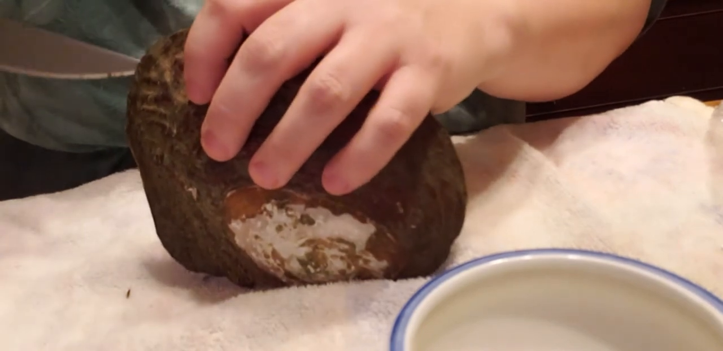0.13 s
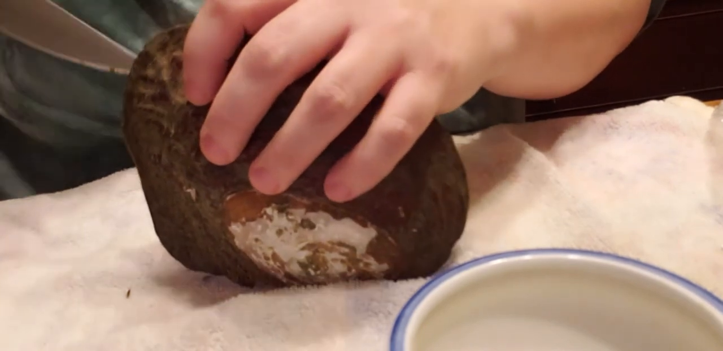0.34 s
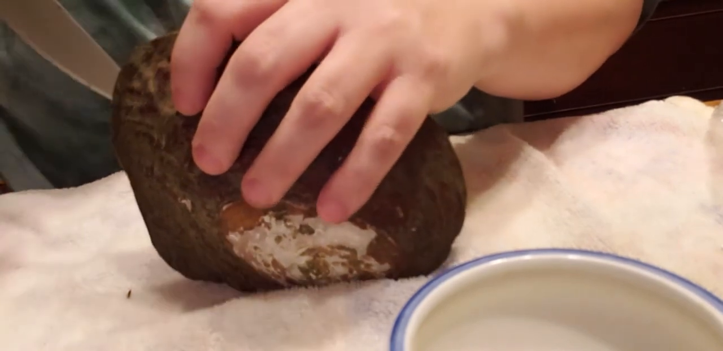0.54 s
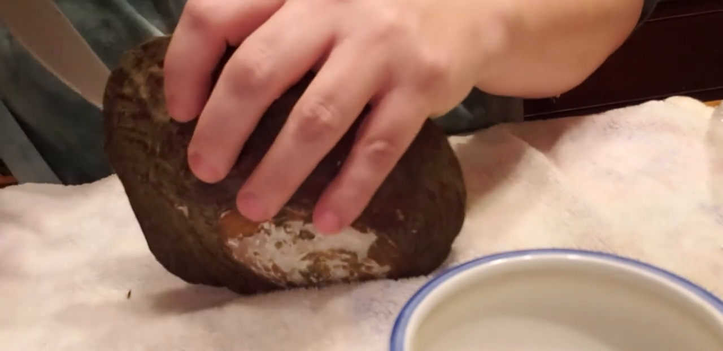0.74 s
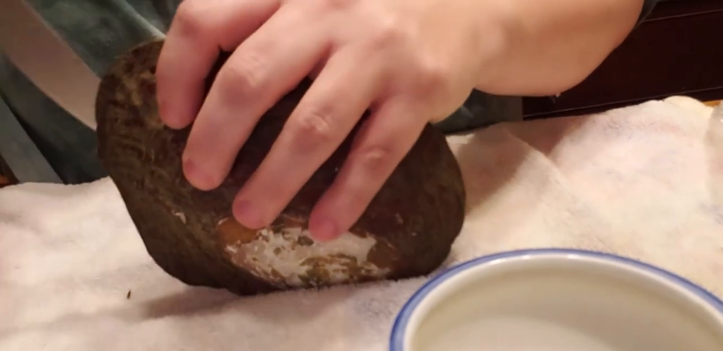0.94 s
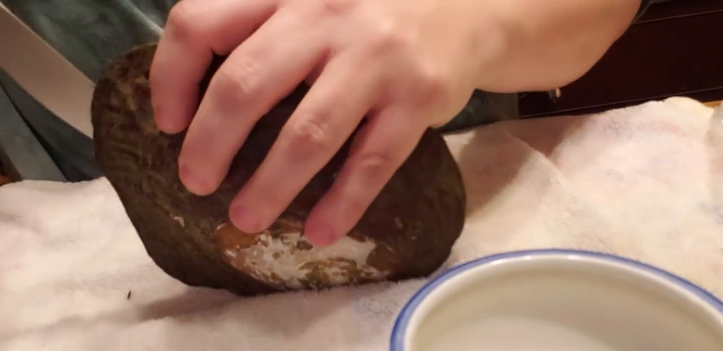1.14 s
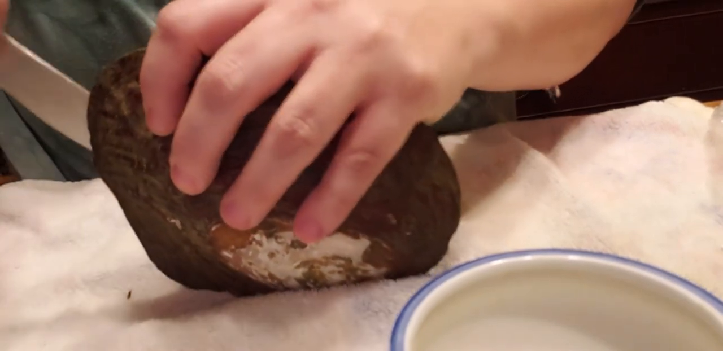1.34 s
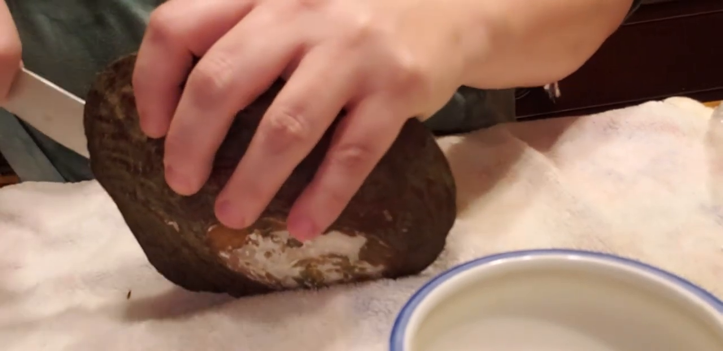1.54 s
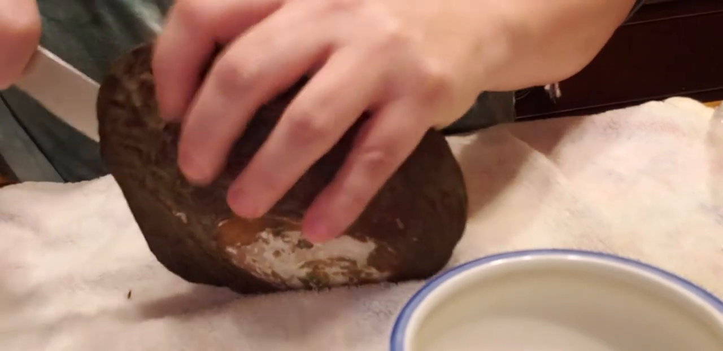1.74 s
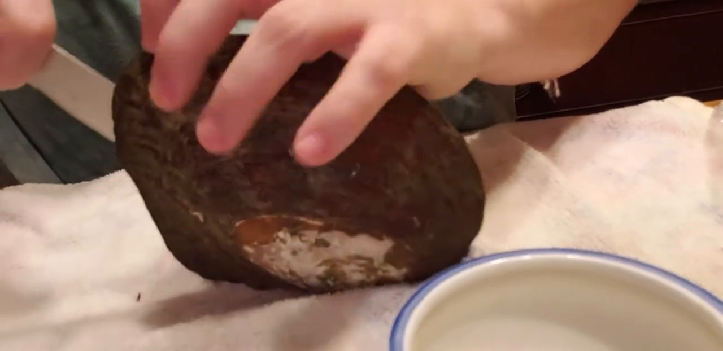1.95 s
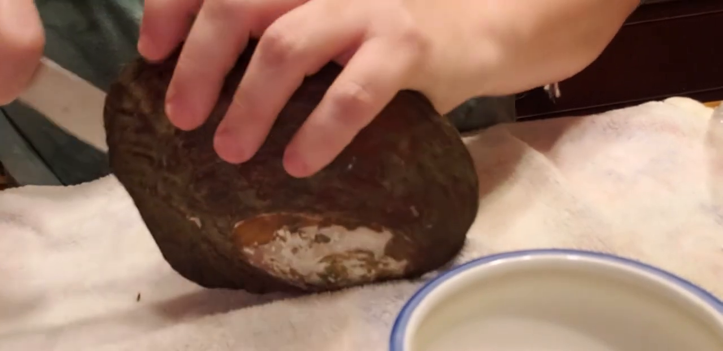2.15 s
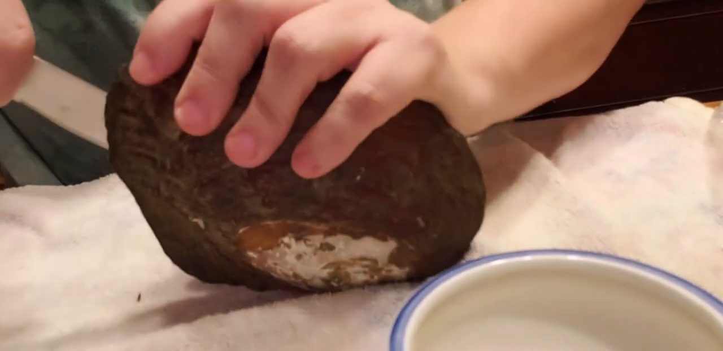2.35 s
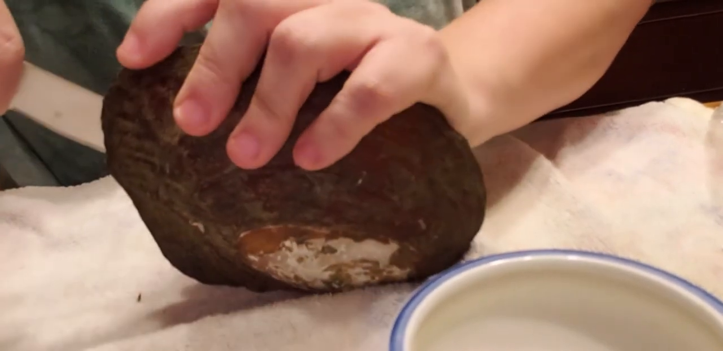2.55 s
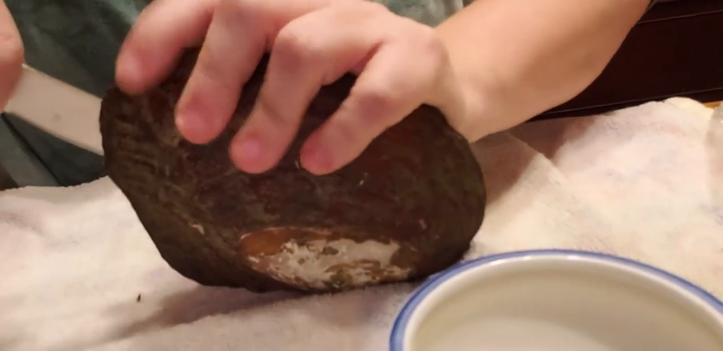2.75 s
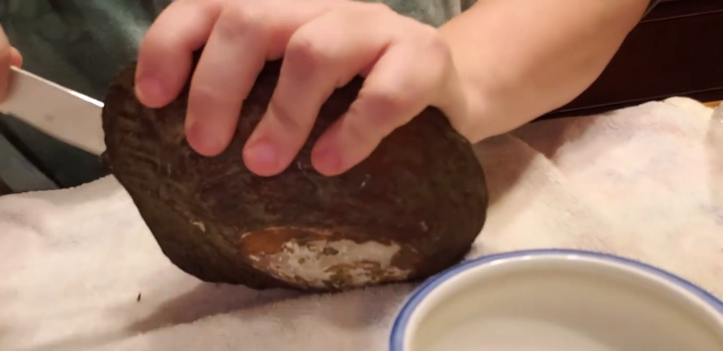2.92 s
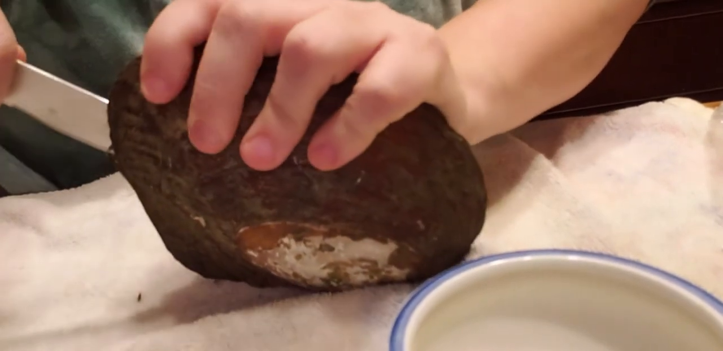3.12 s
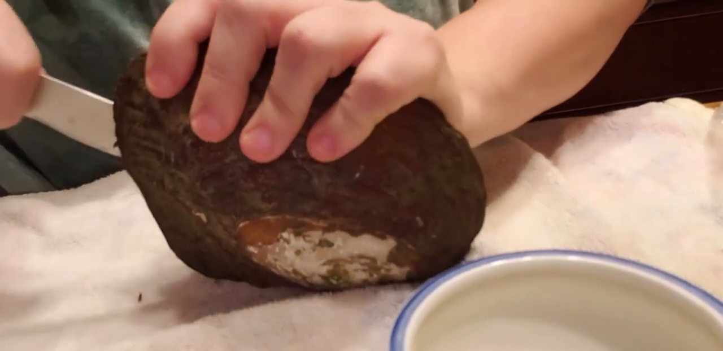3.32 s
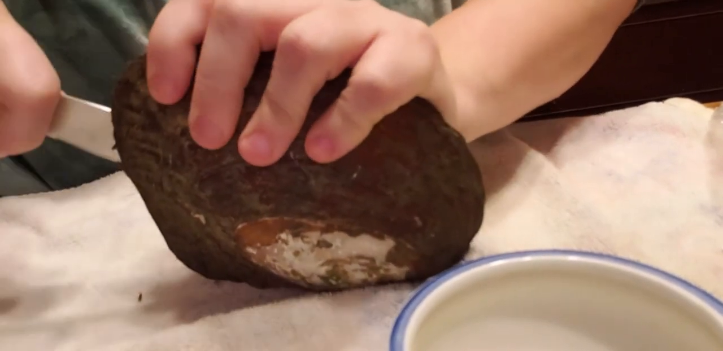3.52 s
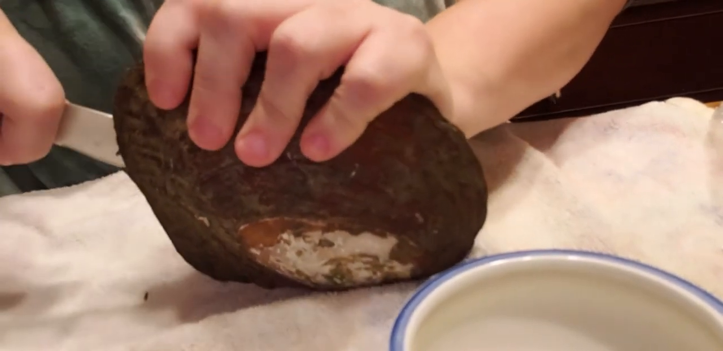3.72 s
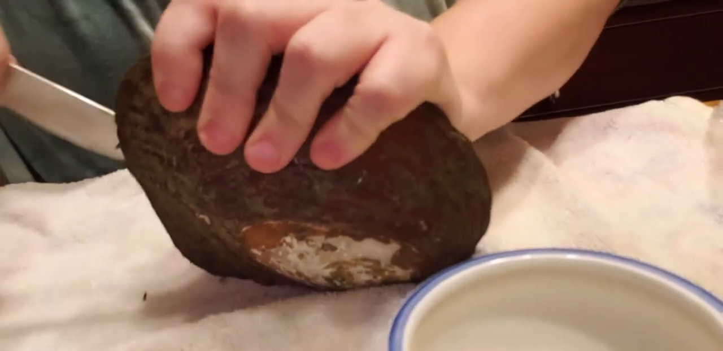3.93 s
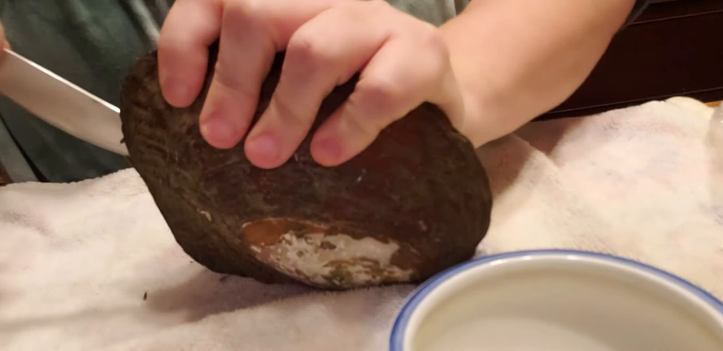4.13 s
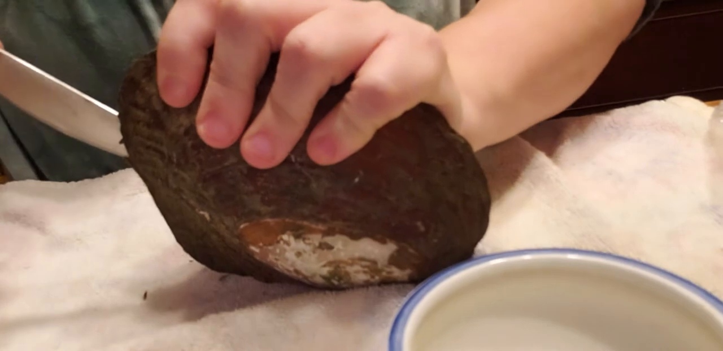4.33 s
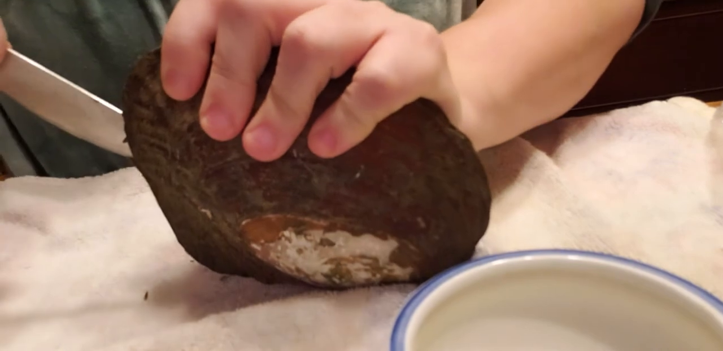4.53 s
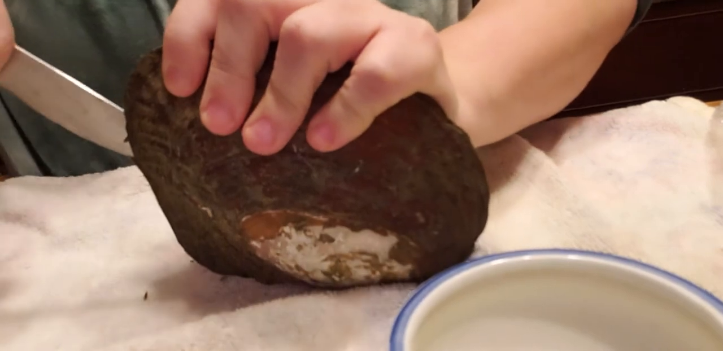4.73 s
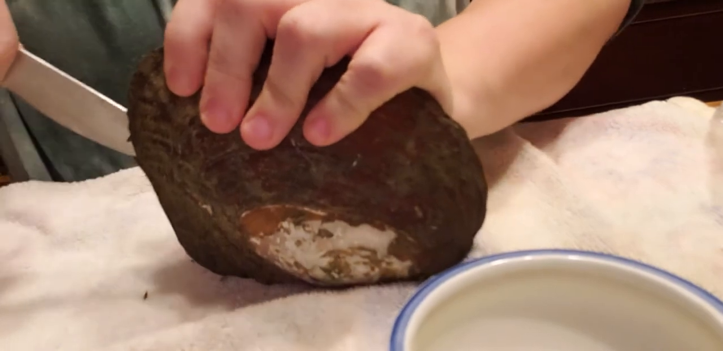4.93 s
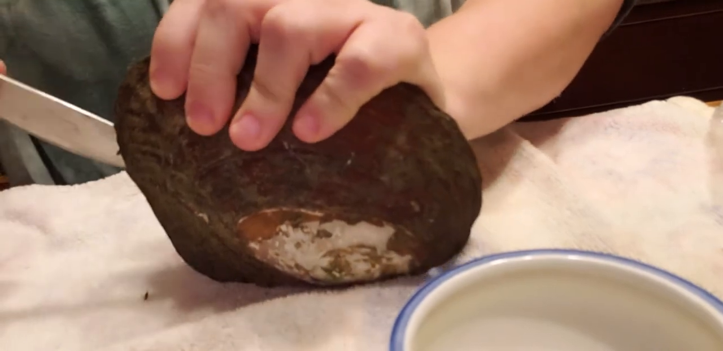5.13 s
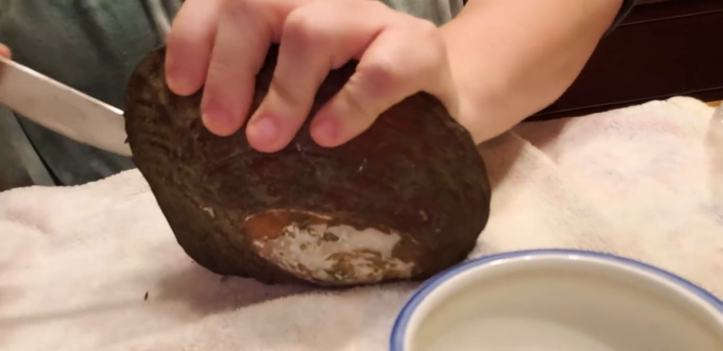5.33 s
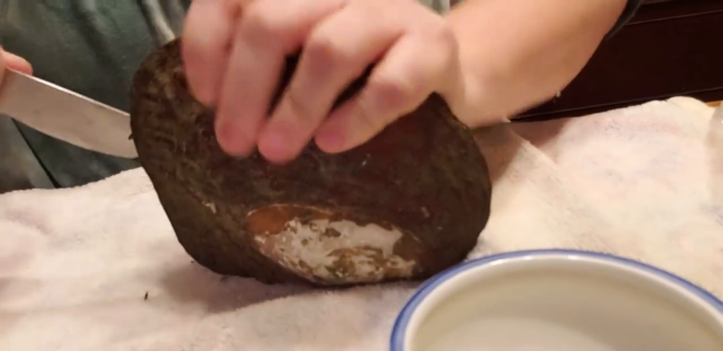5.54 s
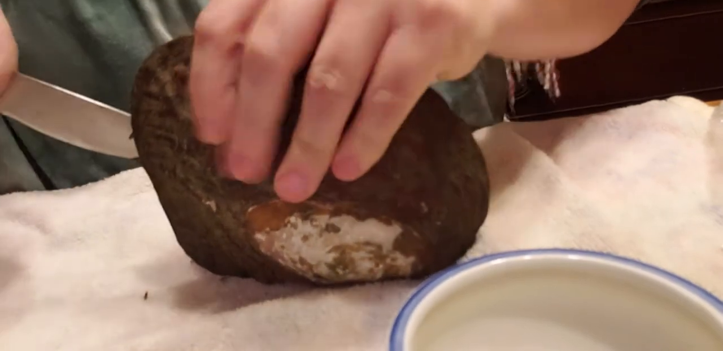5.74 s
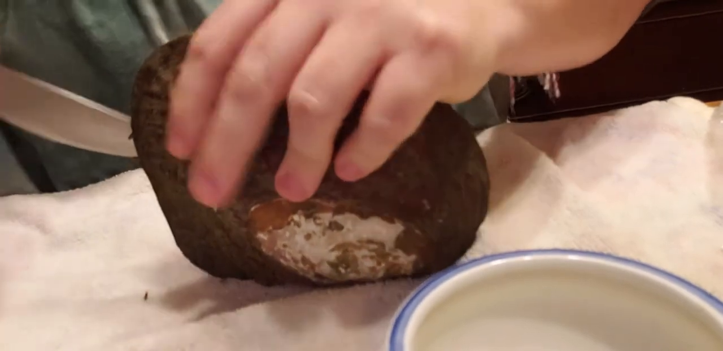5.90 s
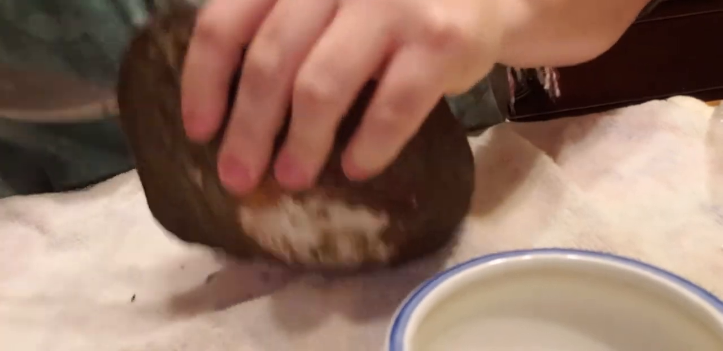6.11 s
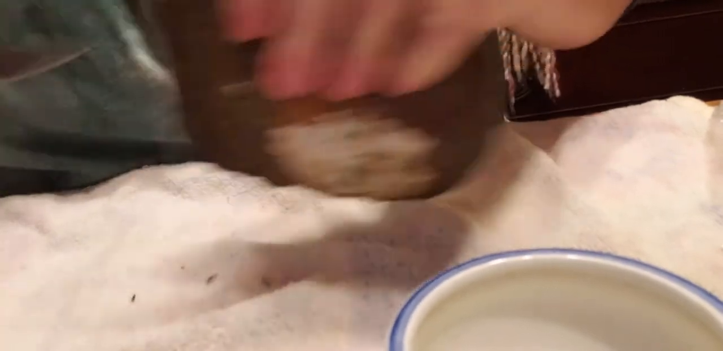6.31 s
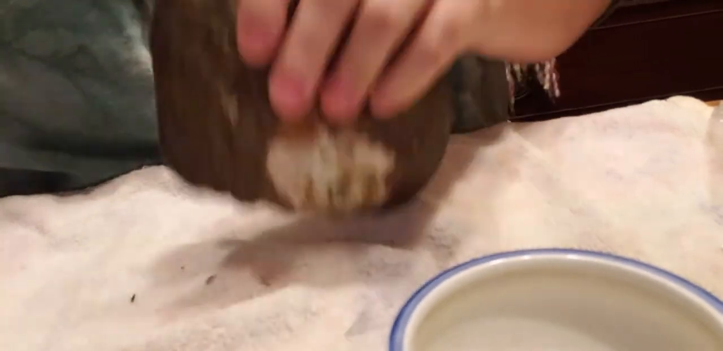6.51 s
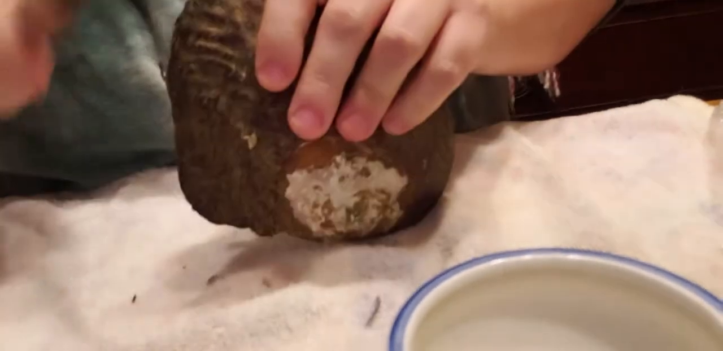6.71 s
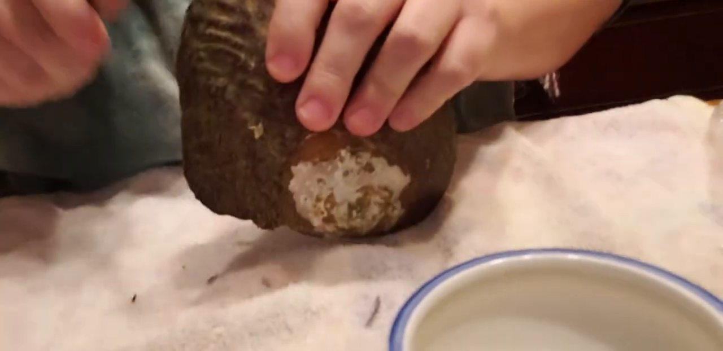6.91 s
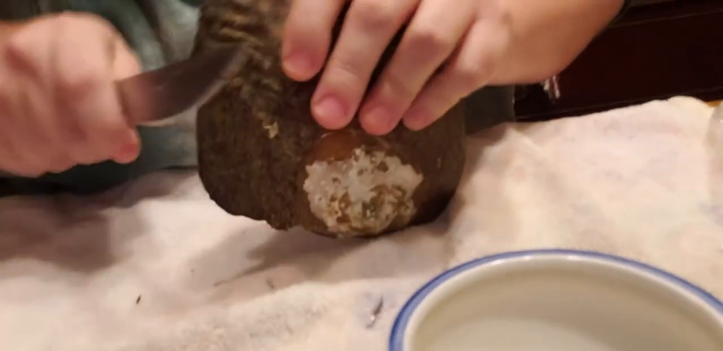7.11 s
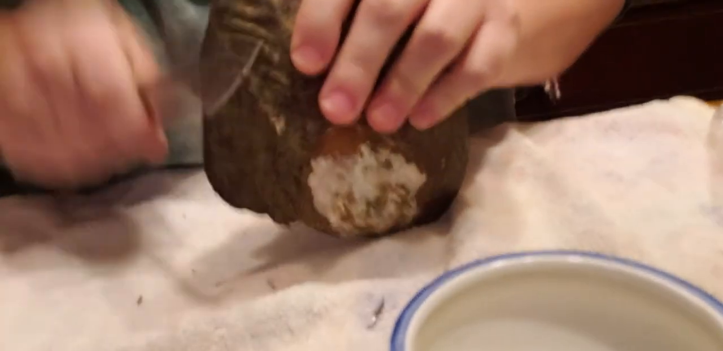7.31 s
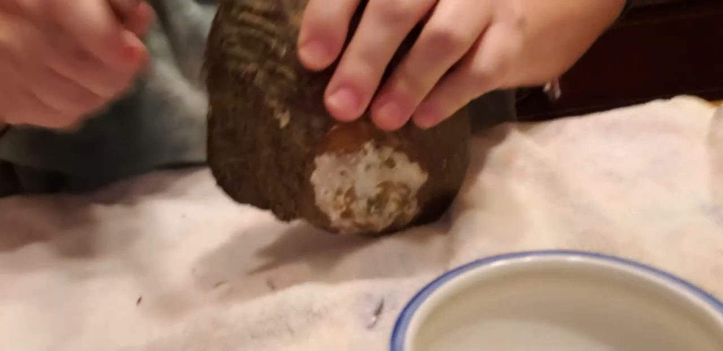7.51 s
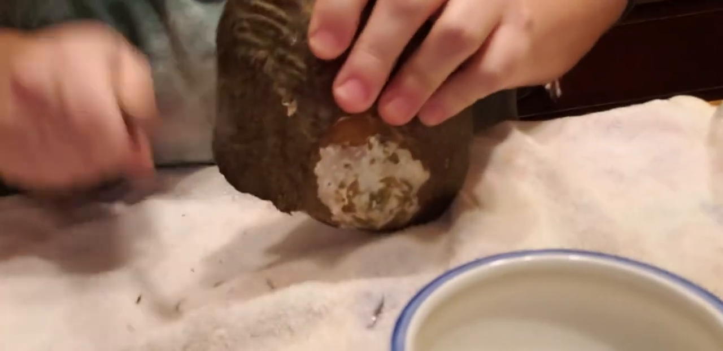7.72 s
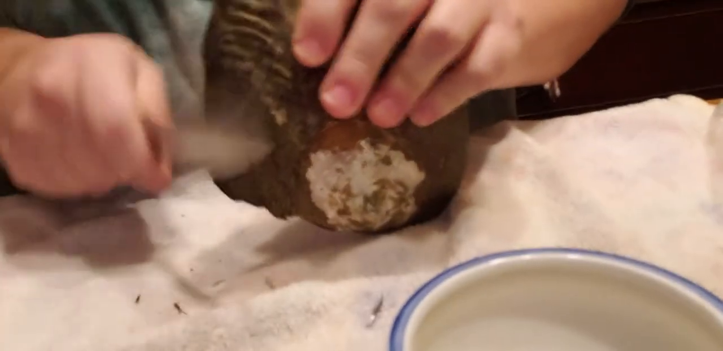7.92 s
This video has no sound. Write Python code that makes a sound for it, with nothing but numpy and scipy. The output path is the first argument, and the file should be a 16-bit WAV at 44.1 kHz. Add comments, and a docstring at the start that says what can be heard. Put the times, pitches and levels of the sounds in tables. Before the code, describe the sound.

A small, quiet room heard very close in stereo, with faint low rumble and slight hiss. From 0.1 s a knife feels for a shell's seam with faint taps, then grinds in short uneven pushes, strongest around 0.8 to 1.5 s: dry rasp, fine grit and the dull rub of shell on towel. It thins to near quiet around 2 s, with little clicks at 2.3 and 2.8. Lower, slightly groaning scrapes come at 3.3 to 4.2 s, then sparse touches and a sharp click at 5.25. Light rubbing near 5.6 leads to bright ticks with a tiny high squeal and steel skid at 6.0, and another slip at 6.3. At 6.63 the shell lands with a heavy padded thud, the table ringing briefly. Four quick chipping strokes at about 7.1, 7.4, 7.6 and 7.9 s crackle and crumble over low thumps, trailing loose crumbs.

```python
"""A small room, two microphones close to a towel-covered table: a hand holds a large shell there
while a knife is worked into its seam. The blade rasps and clicks in slow pushes and slides out;
the shell is set down with a thud, then four quick strokes chip its crumbly edge. Friction is coloured noise
made of random slips, fractures are tiny noise bursts, knocks and table are decaying sines; the room answers."""
import sys
import numpy as np
from scipy import signal
from scipy.fft import rfft, irfft, next_fast_len
from scipy.io import wavfile
from scipy.ndimage import map_coordinates

SR = 44100
rng = np.random.default_rng(int(sys.argv[2]) if len(sys.argv) > 2 else 0)


def persist_wave(psi):
    """Save psi, clipped to +-1, as 16-bit WAV."""
    counts = np.round(np.clip(psi, -1, 1) * 32767).astype(np.int16)
    wavfile.write(sys.argv[1], SR, np.atleast_2d(counts).T)


N = 355446  # samples

TOP_HZ = 15900  # upper band limit


def amp(db):
    """Decibels to gain."""
    return 10 ** (np.asarray(db) / 20)


def unit(x):
    """Scale to rms 1."""
    return x / np.sqrt(np.mean(x ** 2) + 1e-20)


def along(points, hz):
    """Read a curve of (frequency [Hz], value) points on a log frequency axis."""
    f, v = np.transpose(points)
    return np.interp(np.log(hz + 1), np.log(f + 1), v)


def wobble(rate):
    """A smooth random curve, rate knots a second."""
    knots = rng.standard_normal(int(N * rate / SR) + 4)
    return map_coordinates(knots, [np.arange(N) * rate / SR])


def add(track, s, sound):
    """Mix a sound into a track at time s."""
    part = track[round(s * SR):][:len(sound)]
    part += sound[:len(part)]


def colour(x, spectrum, size=8192):
    """Causal minimum-phase filter of energy 1, shaped like the given spectrum."""
    hz = np.fft.rfftfreq(size, 1 / SR)
    gain = amp(along(spectrum, hz))
    # folding the cepstrum puts all of the response after the blow
    cepstrum = irfft(np.log(np.maximum(gain, 1e-6)))
    cepstrum[1:size // 2] *= 2
    cepstrum[size // 2 + 1:] = 0
    response = irfft(np.exp(rfft(cepstrum)))
    return signal.oaconvolve(x, response / np.linalg.norm(response))[:N]


def slips(rate, spread_db):
    """Friction as tiny slips of uneven size at random times, rate a second, rms 1."""
    happens = rng.random(N) < rate / SR
    sizes = rng.standard_normal(N) * amp(spread_db * rng.standard_normal(N))
    return unit(happens * sizes)


def snap(t60):
    """The noise burst of one brittle fracture: it builds at once and dies away."""
    t = np.arange(SR // 20) / SR
    fade = amp(-60 * t / t60) * np.sqrt(t)
    fade /= fade.max()
    burst = unit(rng.standard_normal(len(t)) * fade)
    return burst * np.sqrt(np.mean(fade ** 2))


def narrow(hz, width_hz):
    """A fuzzy line, a slowly drifting phasor that follows a pitch given for each sample, rms 1."""
    lowpass = signal.butter(2, width_hz / 2, fs=SR, output="sos")
    drift = signal.sosfilt(lowpass, rng.standard_normal((2, len(hz))))
    carrier = np.exp(2j * np.pi * np.cumsum(hz) / SR)
    return unit(np.real((drift[0] + 1j * drift[1]) * carrier))


def sing(chatter, hz, ring_db, width_hz):
    """Blend broad chatter with a narrow rasp around the contact resonance, about rms 1."""
    ring = amp(ring_db) * narrow(hz * np.ones(N), width_hz)
    return (unit(chatter) + ring) / np.hypot(1, amp(ring_db))


def swell(track_db, starts, lengths, rise_s, fall_s):
    """Gain of a row of pushes: each rises, holds in a low arch and falls; rise and fall times span 20 dB."""
    arch_db = 2.5  # a push is this much stronger in its middle than at its ends
    power = np.zeros(N)
    for s, length, db in zip(starts, lengths, track_db):
        first = max(s - .15, 0)  # leaves time for the rise
        t = np.arange(SR // 2) / SR + first - s
        arch = arch_db * np.sin(np.pi * np.clip(t / length, 0, 1))
        slopes = 20 * (np.minimum(t, 0) / rise_s - np.maximum(t - length, 0) / fall_s)
        add(power, first, amp(db - arch_db + arch + slopes) ** 2)
    return np.sqrt(power)


def soften(x):
    """Take the top treble off a light contact."""
    soft_hz = 7400  # low-pass corner
    return signal.sosfilt(signal.butter(4, min(soft_hz, TOP_HZ), fs=SR, output="sos"), x)


def contacts(rows):
    """Each contact gives a sharp tick, a tiny burst of fractures, and knocks the shell's body."""
    # bright tick: (frequency [Hz], relative level [dB])
    tick_colour = [(500, -31), (1500, -10.5), (2200, -6), (3100, -5), (4800, -13.5), (6300, -9),
                   (7350, 1.5), (8600, -11.5), (13500, -9), (15500, -13.5)]
    # a knock through the shell's body: (frequency [Hz], relative level [dB])
    body_colour = [(60, 6.5), (150, 4.5), (250, 1.5), (400, 12.5), (700, -1), (1200, -13.5), (1800, -20.5),
                   (4000, -40.5), (9000, -63.5)]
    tip, body = np.zeros((2, N))
    for s, db, body_db in rows:
        burst = snap(t60=0.0023)
        add(tip, s, amp(db) * burst / np.linalg.norm(burst))
        add(body, s, amp([body_db]))  # one-sample blow
    return colour(tip, tick_colour) + colour(body, body_colour)


def room(x, wet_db, near_db, left_db, stir=25, lead=1.25, near_t60=0.036, apart_hz=600, count=4):
    """Direct sound, scatter from table and hands, and the room's tail, at two close microphones.

    wet_db and near_db set tail and scatter against the direct sound; left_db is left over right;
    stir is path changes [knots/s]; lead is how far the left is ahead [samples]; count is the paths."""
    # the room's decay: (frequency [Hz], t60 [s])
    room_decay = [(100, 0.39), (400, 0.27), (2500, 0.28), (7000, 0.25), (15000, 0.2)]
    noise = rng.standard_normal((2, count, 2, SR // 2))
    hz, t, z = signal.stft(noise, SR, nperseg=512)
    hz = hz[:, None]
    # long waves bend round small things and reach both microphones alike
    short = hz / np.hypot(hz, apart_hz)
    mid = z[0] * np.cos(np.pi / 4 * short)
    side = z[1] * np.sin(np.pi / 4 * short)
    fades = np.array([amp(-60 * t / along(room_decay, hz)), short * np.ones_like(t)])  # tail, scatter
    echoes = signal.istft(np.array([mid + side, mid - side]) * fades, SR, nperseg=512)[1]
    echoes[:, :, 1] *= amp(-60 * np.arange(echoes.shape[-1]) / SR / near_t60)
    echoes /= np.linalg.norm(echoes, axis=-1, keepdims=True)
    tail = amp(wet_db) * np.roll(echoes[:, :, 0], SR // 200, axis=-1)  # 5 ms late
    scatter = amp(near_db) * np.roll(echoes[:, :, 1], SR // 3000, axis=-1)  # a third of a ms late
    # the contact point moves, so the sound keeps leaving by other paths
    shares = np.array([wobble(stir) for _ in range(count)])
    shares /= np.linalg.norm(shares, axis=0)
    reflected = signal.fftconvolve((x * shares)[None], tail + scatter, axes=-1).sum(axis=1)[:, :N]
    taps = np.arange(-8, 9)  # fractional delay, in samples
    direct = np.array([np.convolve(x, np.sinc(taps + shift) * np.hanning(len(taps)), "same")
                       for shift in (lead / 2, -lead / 2)])
    total = np.sqrt(1 + amp(wet_db) ** 2 + amp(near_db) ** 2)
    return (direct + reflected) / total * amp([[left_db / 2], [-left_db / 2]])


def floor():
    """Low room rumble and faint microphone hiss: coloured noise, partly shared by the two microphones."""
    # background: (frequency [Hz], relative level [dB])
    floor_colour = [(15, -36), (25, -14.5), (53, 10.5), (87, 0.5), (335, -16.5), (531, -24), (1130, -28),
                    (5280, -36.5), (7510, -26.5), (8360, -40.5), (11300, -31.5), (16000, -36.5)]
    a, b, shared = [unit(colour(rng.standard_normal(N), floor_colour)) for _ in range(3)]
    return amp(-66.5) * np.array([a, b]) + amp(-69) * shared


def landing():
    """The shell lands and rocks; the towel softens the blows, the table rings and the shell crunches faintly."""
    # blows on the table: (time [s], thud level [dB], crunch level [dB])
    blow_table = [(6.628, -12.5, -29), (6.6429, -19.5, -18.5)]
    # modes of the table with the shell on it: (frequency [Hz], relative level [dB], t60 [s])
    table_modes = [(69.9, -6, 0.25), (125.5, 5, 0.33), (153.3, 0.5, 0.39), (214.6, -14.5, 0.2),
                   (263, -6, 0.24), (351, -2, .19), (415, -4, 0.21)]
    # crunch through the towel: (frequency [Hz], relative level [dB])
    padded_colour = [(50, -12), (160, -6.5), (350, -12), (520, -22), (1100, -38), (3000, -55),
                     (7500, -56.5), (15000, -67)]
    thud, crunch = np.zeros((2, N))
    t = np.arange(SR // 2) / SR
    soft_onset = 1 - np.exp(-t / 0.0023)
    for s, db, crunch_db in blow_table:
        # each blow excites the modes a little differently
        ring = sum(amp(level + rng.normal(0, 1) - 60 * t / t60) * np.sin(2 * np.pi * hz * t)
                   for hz, level, t60 in table_modes)
        add(thud, s, amp(db) * ring / np.abs(ring).max() * soft_onset)
        add(crunch, s, amp(crunch_db) * snap(t60=0.061))
    return room(thud + colour(crunch, padded_colour), wet_db=-7.5, near_db=-12, left_db=0.5, stir=8)


def knocks():
    """The gripped shell rings briefly as decaying sines; the deepest knocks are its rocking on the table."""
    # hollow knocks on blade, hand and table: (time [s], level [dB], pitch [Hz], t60 [s])
    knock_table = [(.059, -33.5, 420, 0.047), (0.162, -23, 420, 0.016), (2.280, -40, 640, 0.031),
                   (2.832, -31.5, 95, .07), (3.625, -33.5, 70, .2), (3.853, -27.5, 105, 0.039),
                   (4.868, -36.5, 72, .13), (5.2461, -17, 1000, 0.0049), (5.618, -27, 72, 0.077),
                   (5.783, -43, 476, 0.02), (6.319, -18, 368, 0.035), (6.321, -31, 2140, 0.01),
                   (6.43, -27.5, 410, 0.0099), (6.435, -34.5, 765, 0.013), (6.630, 6, 186, 0.017),
                   (6.641, -11, 412, 0.02), (7.076, -17, 2250, 0.012), (7.08, -0.5, 266, 0.012),
                   (7.108, -20, 402, 0.074), (7.134, -12, 390, 0.022), (7.134, -25, 2400, 0.012),
                   (7.647, -16, 370, 0.024)]
    rings = np.zeros(N)
    t = np.arange(SR // 5) / SR
    for s, db, hz, t60 in knock_table:
        onset = 1 - np.exp(-2 * hz * t)  # time constant of half a cycle
        add(rings, s, amp(db - 60 * t / t60) * np.sin(2 * np.pi * hz * t) * onset)
    return room(rings, left_db=0.0, near_db=-5.5, wet_db=-7)


def squeals():
    """Where the edge bites hard, the steel gives a short, very high squeal: a narrow band of noise."""
    # squeals: (start [s], length [s], level [dB], pitch [Hz], width [Hz])
    squeal_table = [(5.985, 0.017, -40, 12600, 4010), (6.003, 0.018, -32, 12510, 4000),
                    (7.133, 0.003, -26.5, 14500, 1490), (7.135, 0.0086, -46, 14600, 304)]
    track = np.zeros(N)
    for s, length, db, hz, width_hz in squeal_table:
        gate = signal.windows.tukey(round(length * SR), .2)
        add(track, s, amp(db) * gate * narrow(np.full(len(gate), hz), width_hz))
    return room(track, left_db=-0.5, near_db=0, wet_db=-8)


def clicks():
    """Bright catches of the tip and duller taps of the flat of the blade."""
    # the blade tip catches: (time [s], tick level [dB], body level [dB])
    catch_table = [(2.267, -27, -28), (2.280, -26.5, -24.5), (2.811, -27.5, -22), (2.831, -36, -16),
                   (3.084, -21.5, -54), (4.660, -35, -54), (5.1425, -23, -38.5), (5.2457, -10.5, -42),
                   (5.2469, -25, -9), (5.799, -32.5, -36.5), (5.985, -16.5, -25), (6.034, -16.5, -36),
                   (6.322, -19.5, -33), (7.077, -9, -37)]
    # the flat of the blade feels for the seam: (time [s], tick level [dB], body level [dB])
    tap_table = [(0.06, -37.5, -55), (0.13, -40, -25), (.154, -35, -45), (0.164, -28.5, -38)]
    touches = contacts(catch_table) + soften(contacts(tap_table))
    return room(touches, left_db=1.0, near_t60=0.019, near_db=-1.5, wet_db=-5)


def slide():
    """Steel skids over the hard lip in a fine chatter that swells until the blade slips off."""
    # skids, rise and fall over 20 dB: (peak time [s], level before a 2.5 dB lift [dB], rise [s], fall [s])
    skid_table = [(6.012, -40, 0.064, 0.092), (6.325, -41, 0.049, 0.012)]
    # chatter of the steel: (frequency [Hz], relative level [dB])
    steel_colour = [(50, -21.5), (200, -1.5), (420, 3.5), (660, -12.5), (1000, -7.5), (1500, -16),
                    (2200, -13.5), (3250, -15.5), (6000, -10), (7400, -4.5), (8800, -15), (13100, -11.5),
                    (16000, -18)]
    ring_hz, ring_db = 2160, -13  # the lip's ring, and its level over the chatter
    t = np.arange(N) / SR
    level = sum(amp(db - 20 * np.maximum((s - t) / rise, (t - s) / fall)) for s, db, rise, fall in skid_table)
    chatter = colour(slips(rate=8300, spread_db=6.0), steel_colour)
    skid = amp(2.5) * sing(chatter, ring_hz, ring_db, width_hz=510)
    return room(level * skid, left_db=0.0, near_t60=0.017, near_db=2.5, wet_db=-13.0)


def chipping():
    """In each stroke the edge crumbles in clumps and flakes snap off; every blow is passed down to the table."""
    # quick strokes on the edge: (start [s], length [s], crumbling at mid-stroke [dB],
    # swell over the stroke [dB], ring of the edge over the crumbling [dB])
    stroke_table = [(7.075, 0.062, -47, 6.5, 4.5), (7.377, 0.041, -47.5, 11, -8.5),
                    (7.6224, 0.034, -30.5, 10.5, -10), (7.895, 0.047, -30, 8, -12)]
    # larger flakes that snap off: (time [s], crack level [dB], thump level [dB])
    flake_table = [(7.0768, -14, 3), (7.1301, -15.5, -3.5), (7.1336, -19, -13.5), (7.145, -29, -12.5),
                   (7.382, -22.5, -3), (7.401, -29, -7.5), (7.409, -33, -8), (7.467, -40.5, -18),
                   (7.6267, -16.5, 3.5), (7.633, -19, -5.5), (7.6356, -15, -1.5), (7.647, -17.5, -1),
                   (7.654, -17.5, -5.5), (7.657, -21, -4.5), (7.682, -25.5, -19), (7.898, -37, 0),
                   (7.9307, -16.5, -17), (7.937, -20, -4.5), (7.971, -28, -4.5)]
    # crumbling edge, then thump through the table: (frequency [Hz], relative level [dB])
    flake_colour = [(300, -38), (600, -4), (1500, -9), (2300, -1), (3600, -2.5), (5500, -0.5), (7300, 1),
                    (8400, -7), (13500, -4.5), (15200, 2.5), (16500, -31.5)]
    thump_colour = [(25, -49), (60, 0.5), (150, 5.5), (280, 3), (410, -2), (540, -16), (900, -17.5),
                    (2200, -99.5)]
    crumbs_below_db, crumbs_t60 = 10.5, 0.29  # loose crumbs trail after a stroke (dB under it, s)
    edge_ring_hz = 2300
    cracks, blows, pressure, loose, ringing = np.zeros((5, N))
    for s, db, thump_db in flake_table:
        add(cracks, s, amp(db) * snap(t60=0.0026))
        add(blows, s, amp([thump_db]))
    t = np.arange(SR // 4) / SR
    for s, length, db, swell_db, ring_db in stroke_table:
        ploughing = amp(db + swell_db * (t / length - .5)) * (t < length)
        trailing = amp(db - crumbs_below_db - 60 * (t - length) / crumbs_t60) * (t >= length)
        add(pressure, s, ploughing)
        add(loose, s, trailing)
        add(ringing, s, (ploughing + trailing) * amp(ring_db))
    clumps = unit(amp(0.83 * wobble(450)) * slips(rate=7000, spread_db=0.5))
    crumble = pressure * clumps + soften(loose * clumps)
    ring = ringing * narrow(np.full(N, edge_ring_hz), width_hz=1100)
    edge = ring + colour(cracks + crumble, flake_colour)
    crunch = room(edge, left_db=0.5, near_t60=0.012, near_db=5.0, wet_db=-4.0, stir=70)
    passed_down = colour(blows + amp(-1) * crumble, thump_colour)
    thump = room(passed_down, left_db=-0.5, near_db=-0.5, wet_db=-0.5)
    return crunch + thump


def pushes():
    """Each push drags the shell on the towel and grinds the blade in the seam, with a ring that sags."""
    # pushes of the knife: (start [s], length [s], rub of the shell on the towel [dB], rasp of the blade [dB],
    # fine grit before a 4.5 dB lift [dB], starting ring of the contact [Hz], ring over rasp [dB])
    push_table = [(0.135, 0.039, -46, -61, -71.5, 3106, 0.5), (0.32, 0.035, -57, -69.5, -72, 3400, 4),
                  (0.395, 0.14, -47, -50, -60.5, 3078, -3), (0.476, 0.082, -46, -53, -56.5, 2290, -18),
                  (0.701, 0.16, -47, -67.5, -65, 3463, -5.5), (0.82, 0.075, -37.5, -44.5, -50.5, 3400, -14),
                  (0.985, 0.11, -39.5, -49.5, -63.5, 3080, -16), (1.129, 0.093, -37, -47, -58, 2600, -5),
                  (1.32, 0.072, -37.5, -45, -56.5, 3130, -7.5), (1.442, 0.054, -38, -48, -58, 3084, -8.5),
                  (1.578, 0.024, -50.5, -65, -71.5, 3050, -8), (1.802, 0.018, -58, -67.5, -74.5, 845, -4),
                  (1.905, 0.041, -52.5, -70.5, -71.5, 3070, -28),
                  (2.425, 0.097, -62.5, -75, -74.5, 650, -6), (2.819, 0.026, -52.5, -60, -64, 2156, -7),
                  (2.87, 0.083, -57, -65, -67.5, 2145, -19), (3.075, 0.065, -55.5, -66.5, -69.5, 694, -3),
                  (3.269, 0.15, -45, -57, -64.5, 700, -1), (3.44, 0.137, -44.5, -51.5, -61.5, 759.3, 1.5),
                  (3.859, 0.025, -38.5, -52, -66, 801.4, 3.5),
                  (3.886, 0.093, -49.5, -44.5, -51.5, 817.6, -2.5),
                  (4.154, 0.0683, -47, -55.5, -60, 661, 4), (4.421, 0.068, -56, -72.5, -76, 788, 0),
                  (4.87, 0.018, -55, -78, -80, 722, -13), (5.549, 0.037, -45.5, -69.5, -67, 3140, -4),
                  (5.599, 0.077, -42.5, -62.5, -59.5, 3126, 6), (5.686, 0.014, -68, -54, -58.5, 2956, 9),
                  (5.939, 0.11, -58, -54, -55, 2246, 5), (6.04, 0.066, -50, -65, -79, 2190, -20)]
    # towel rub, blade rasp and fine grit: (frequency [Hz], relative level [dB])
    rub_colour = [(25, -29), (70, 1.5), (170, 1), (300, -4.5), (440, -6), (560, -27.5), (800, -28),
                  (1700, -73)]
    rasp_colour = [(250, -32), (500, 2.5), (850, -2), (1400, -14.5), (2100, -10.5), (2700, -15),
                   (3200, -10.5), (3550, -19.5), (4000, -27), (8000, -59)]
    grit_colour = [(2350, -49), (4000, -9), (4900, -6.5), (6470, -5), (7400, 3), (8400, -3.5), (10100, -8),
                   (11300, 2), (13000, -5), (16000, 0.5)]
    sag_oct_per_s = .15  # the ring falls a little as the blade sinks deeper
    starts, lengths, rub_db, rasp_db, grit_db, ring_hz, ring_db = np.transpose(push_table)
    rub = swell(rub_db, starts, lengths, rise_s=0.043, fall_s=0.093)
    rasp = swell(rasp_db, starts, lengths, rise_s=0.036, fall_s=0.045)
    grit = swell(grit_db, starts, lengths, rise_s=0.052, fall_s=0.058)
    t = np.arange(N) / SR
    halfway = (starts[1:] + (starts + lengths)[:-1]) / 2
    now = np.searchsorted(halfway, t)  # the nearest push
    hz = ring_hz[now] * 2 ** (-sag_oct_per_s * np.clip(t - starts[now], 0, lengths[now]))
    catch = amp(0.56 * wobble(100))  # the blade catches and runs on
    low = rub * unit(colour(slips(rate=2700, spread_db=1.0), rub_colour))
    grinding = colour(slips(rate=5000, spread_db=2.0), rasp_colour)
    middle = rasp * sing(grinding, hz, ring_db[now], width_hz=540)
    high = grit * amp(4.5) * unit(colour(slips(rate=25000, spread_db=4.0), grit_colour))
    return room(low + catch * (middle + high), wet_db=-6.5, near_db=0.0, left_db=0.5)


def scene():
    """All sources at the two microphones."""
    return floor() + landing() + knocks() + squeals() + clicks() + slide() + chipping() + pushes()


def record(dry):
    """Each microphone has its own treble; the deepest bass is shed and a steep filter sets the band limit."""
    # balance of the two microphones: (frequency [Hz], left over right [dB])
    port_balance = [(1200, 1.5), (3500, 2.5), (6000, 4.5), (7200, 5.5), (13000, -2.5)]
    size = next_fast_len(N + SR // 4)
    left_db = along(port_balance, np.fft.rfftfreq(size, 1 / SR))
    heard = irfft(rfft(dry, size) * amp([left_db / 2, -left_db / 2]), size)[:, :N]
    lean = signal.sosfilt(signal.butter(2, 42, "highpass", fs=SR, output="sos"), heard)
    return signal.sosfilt(signal.ellip(10, .2, 80, TOP_HZ, fs=SR, output="sos"), lean)


dry = scene()
out = record(dry)
persist_wave(out)
```